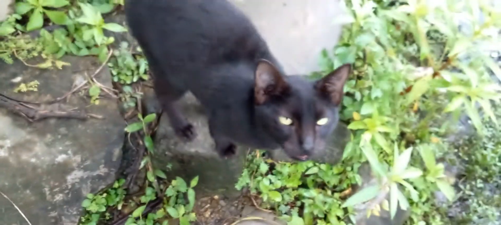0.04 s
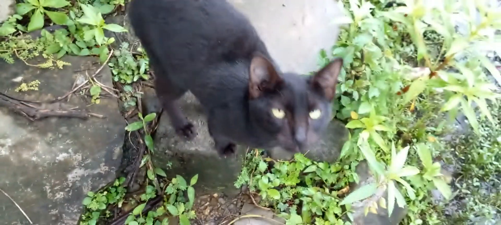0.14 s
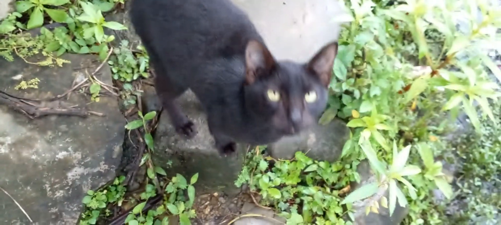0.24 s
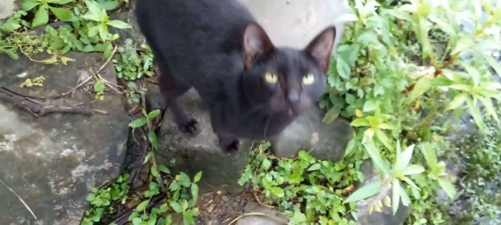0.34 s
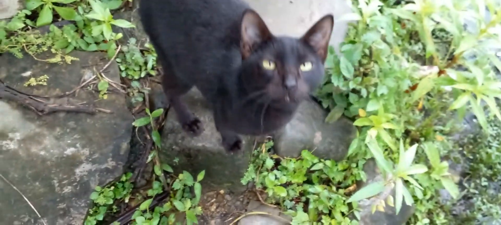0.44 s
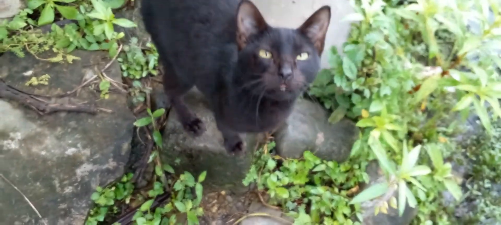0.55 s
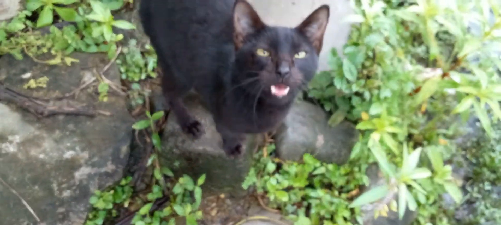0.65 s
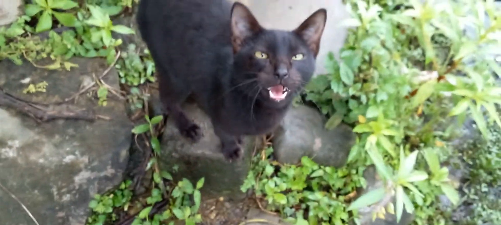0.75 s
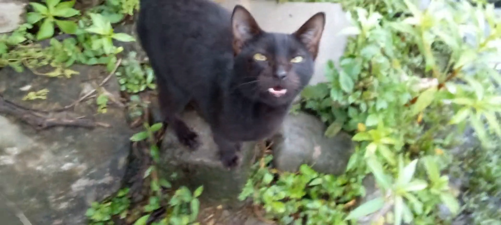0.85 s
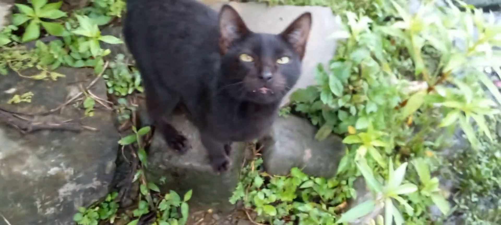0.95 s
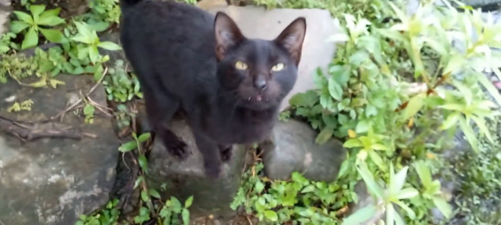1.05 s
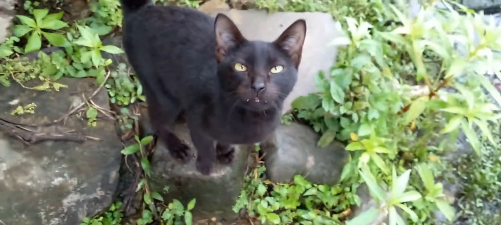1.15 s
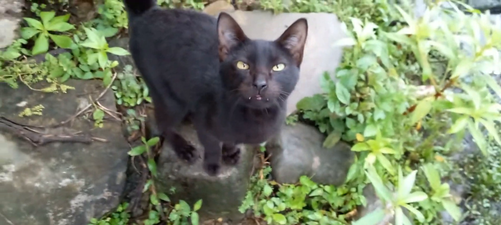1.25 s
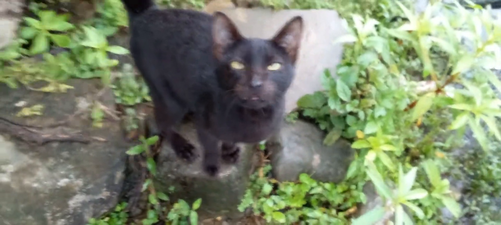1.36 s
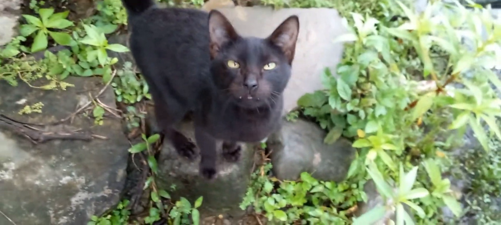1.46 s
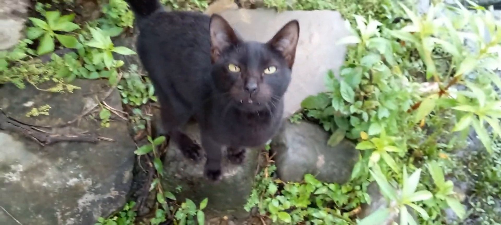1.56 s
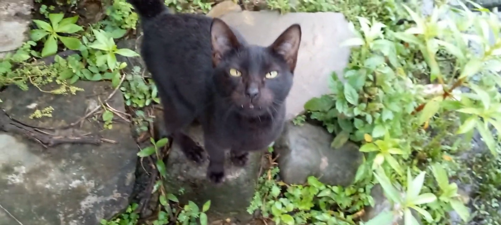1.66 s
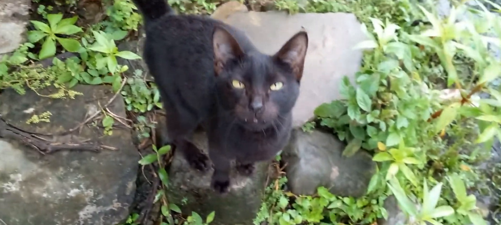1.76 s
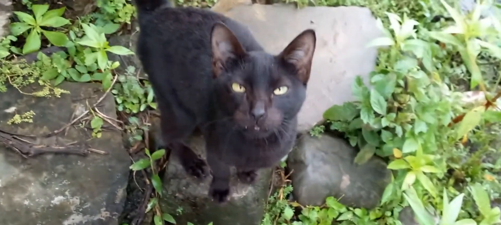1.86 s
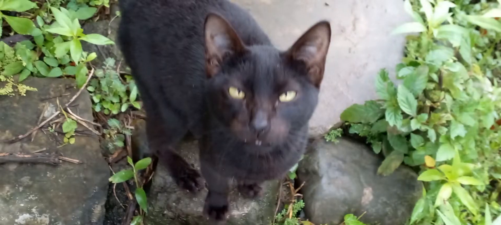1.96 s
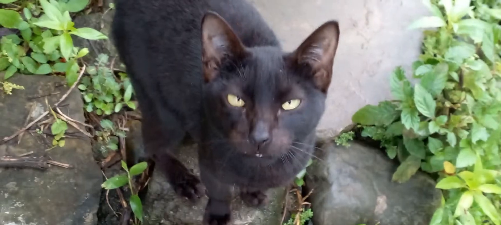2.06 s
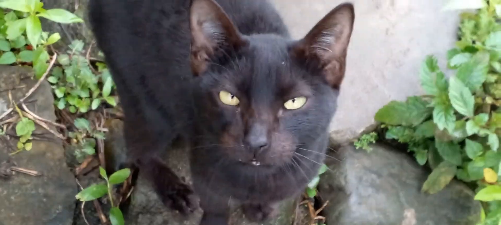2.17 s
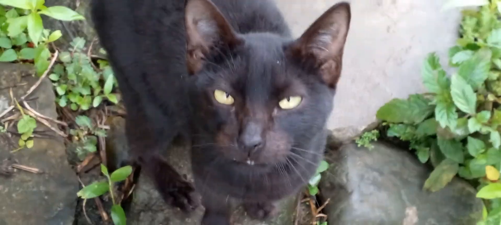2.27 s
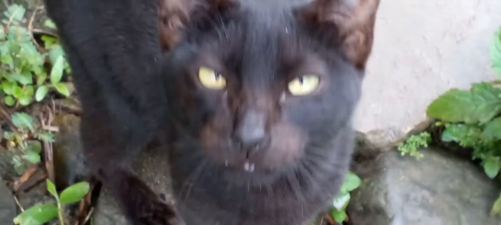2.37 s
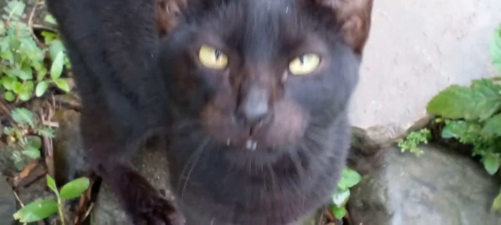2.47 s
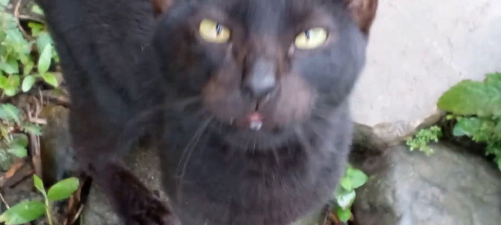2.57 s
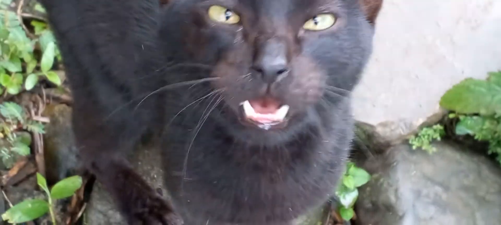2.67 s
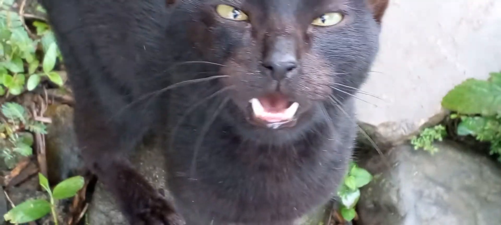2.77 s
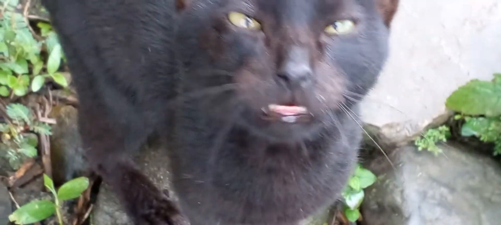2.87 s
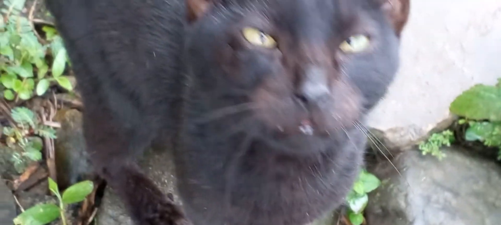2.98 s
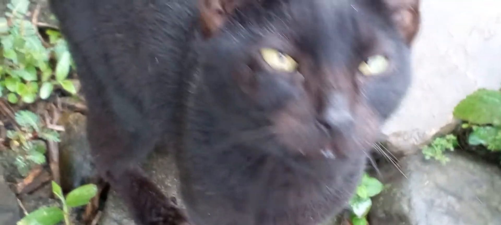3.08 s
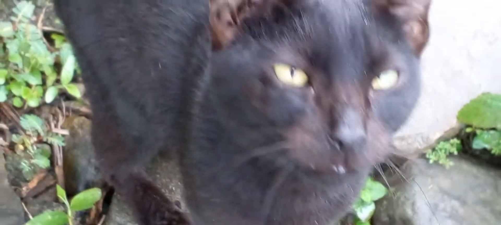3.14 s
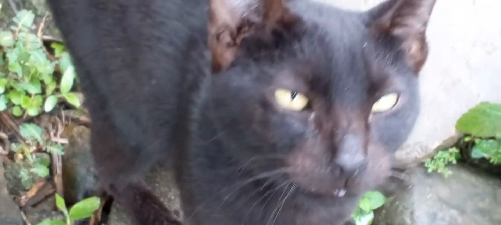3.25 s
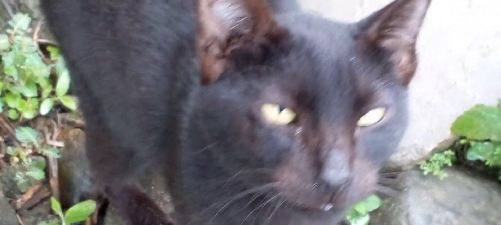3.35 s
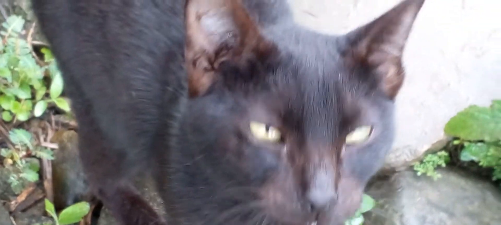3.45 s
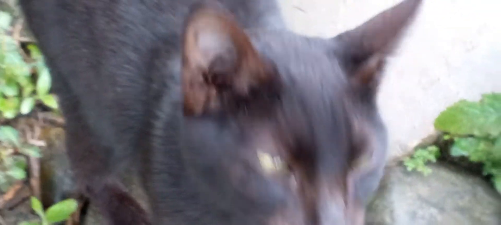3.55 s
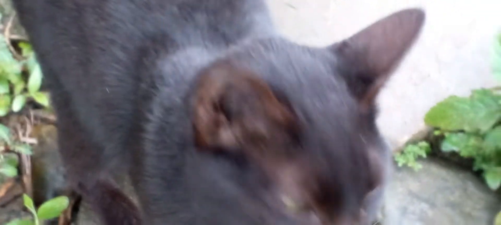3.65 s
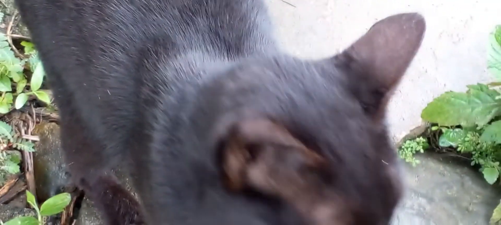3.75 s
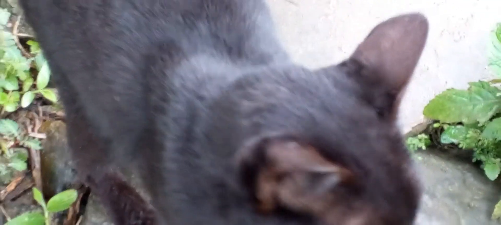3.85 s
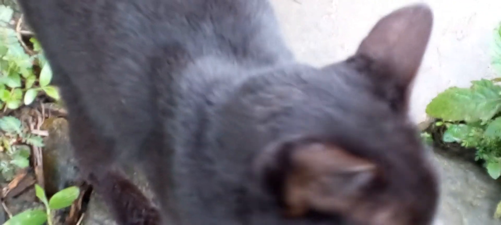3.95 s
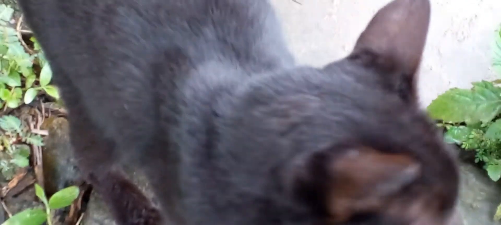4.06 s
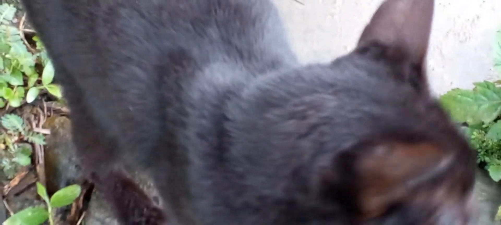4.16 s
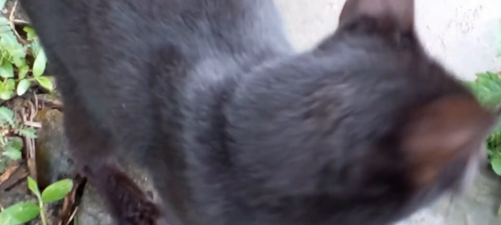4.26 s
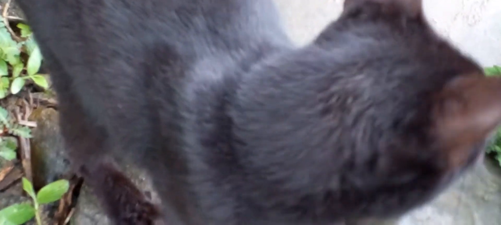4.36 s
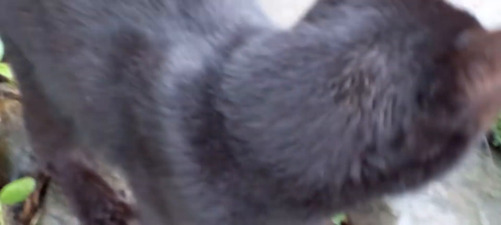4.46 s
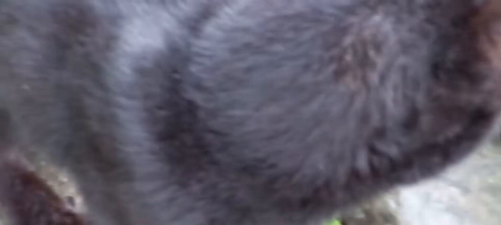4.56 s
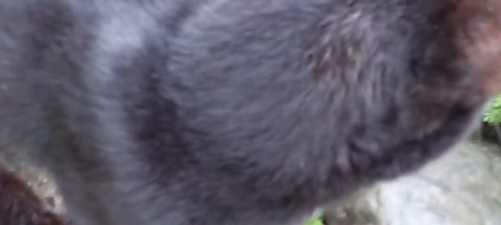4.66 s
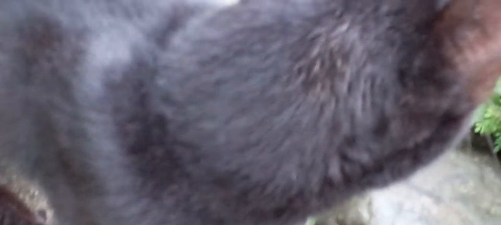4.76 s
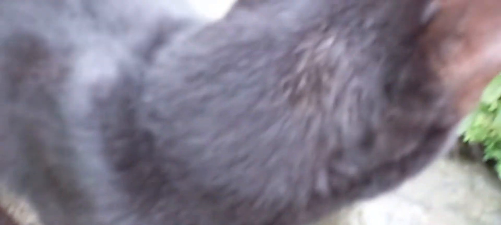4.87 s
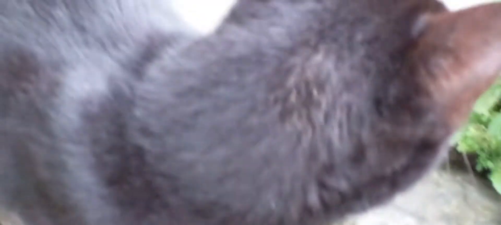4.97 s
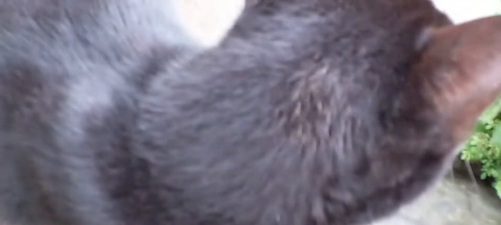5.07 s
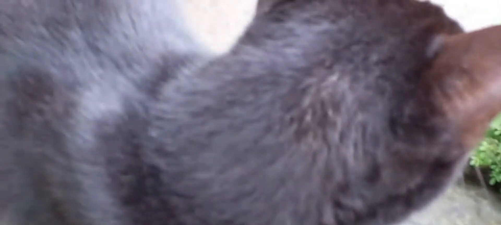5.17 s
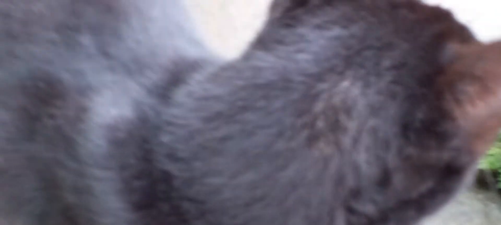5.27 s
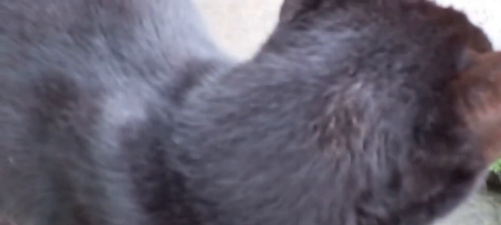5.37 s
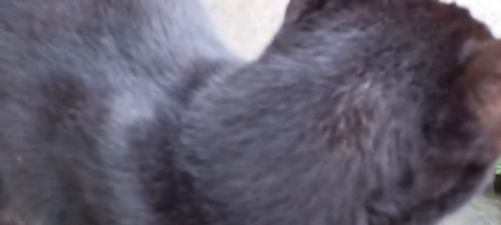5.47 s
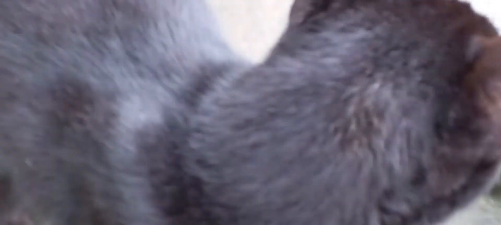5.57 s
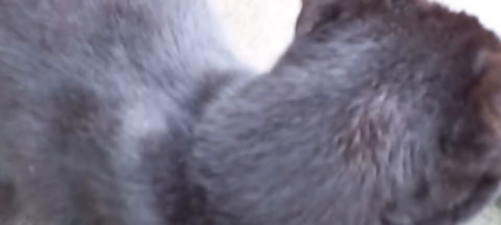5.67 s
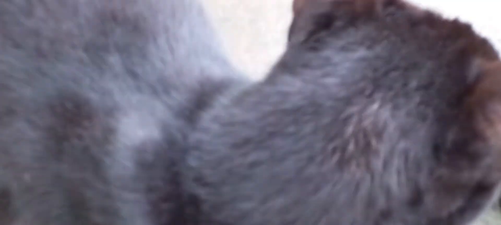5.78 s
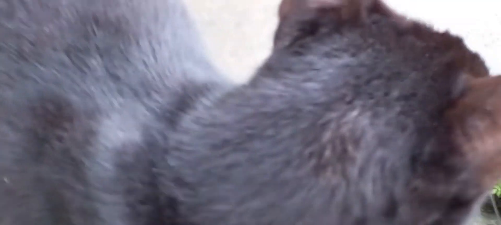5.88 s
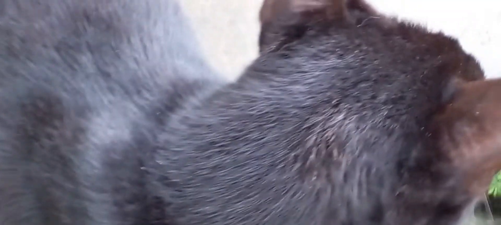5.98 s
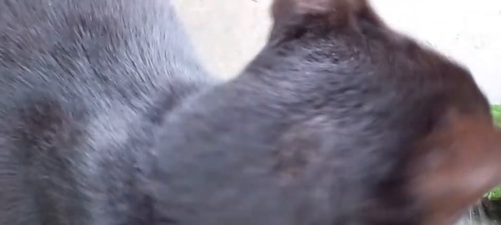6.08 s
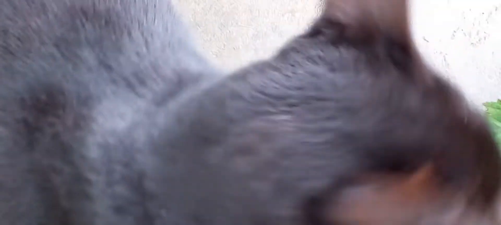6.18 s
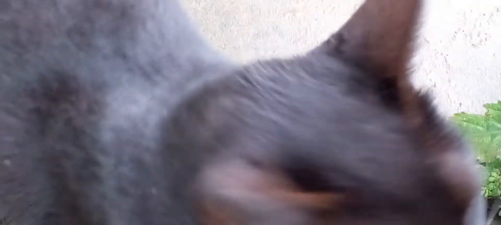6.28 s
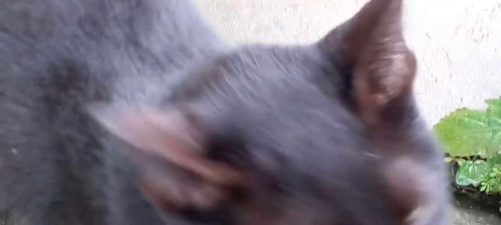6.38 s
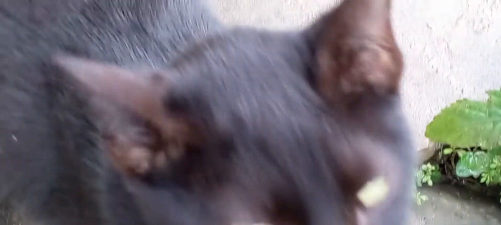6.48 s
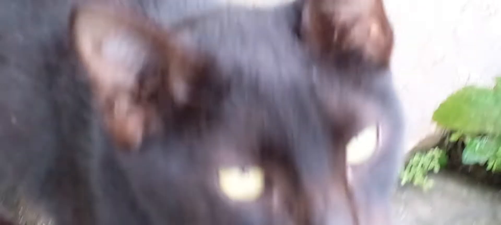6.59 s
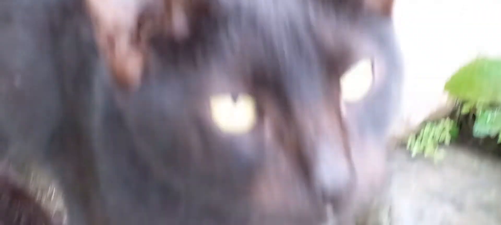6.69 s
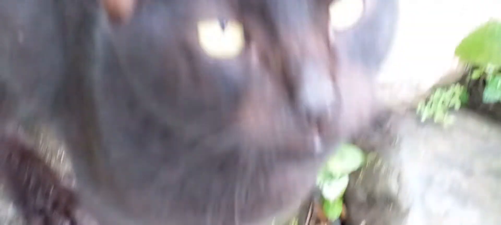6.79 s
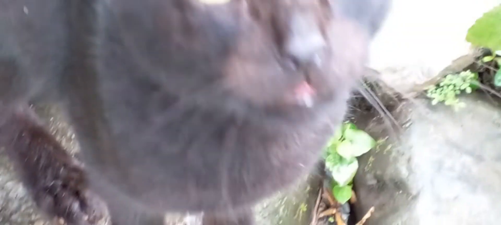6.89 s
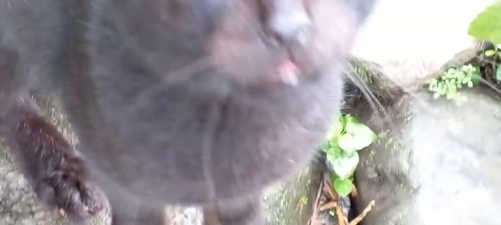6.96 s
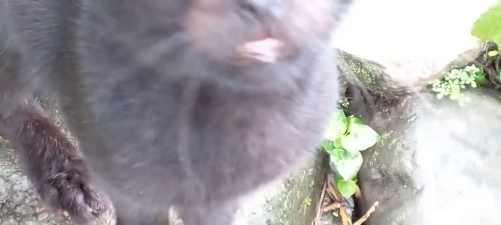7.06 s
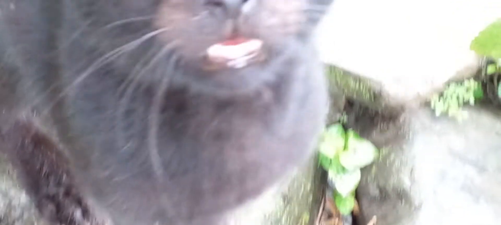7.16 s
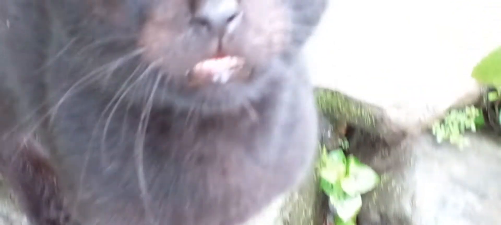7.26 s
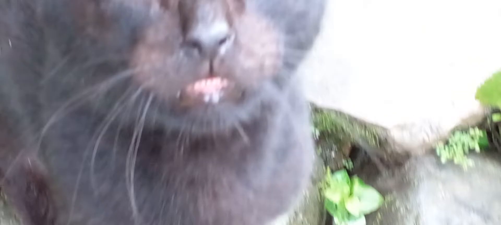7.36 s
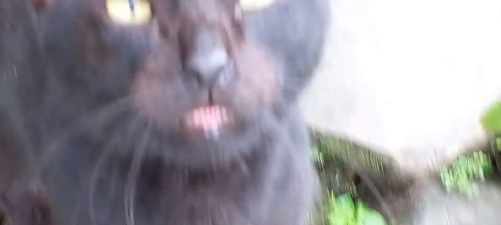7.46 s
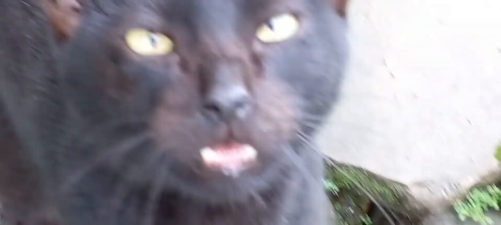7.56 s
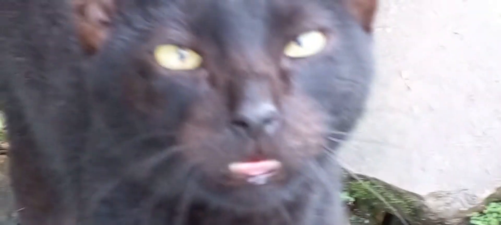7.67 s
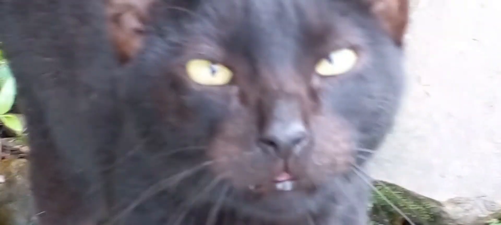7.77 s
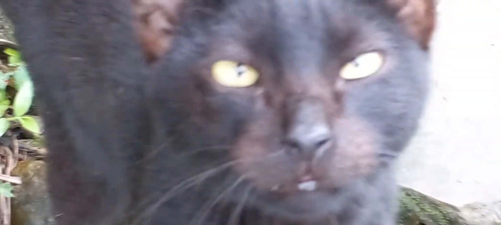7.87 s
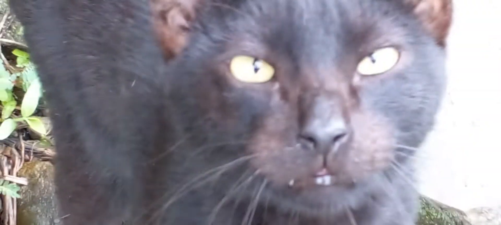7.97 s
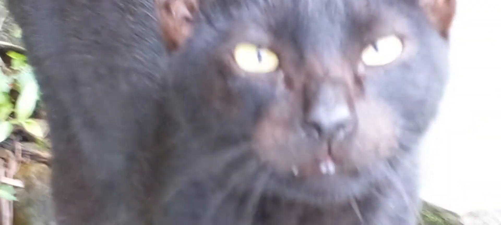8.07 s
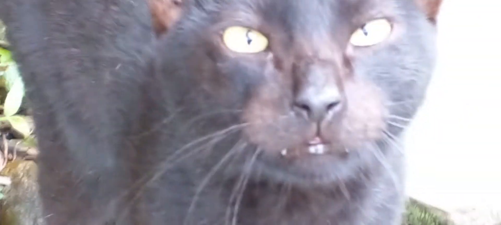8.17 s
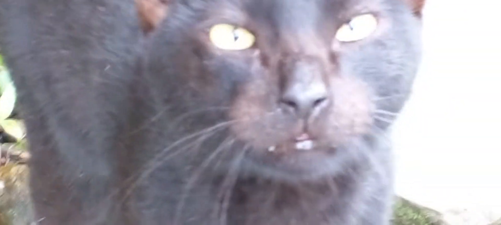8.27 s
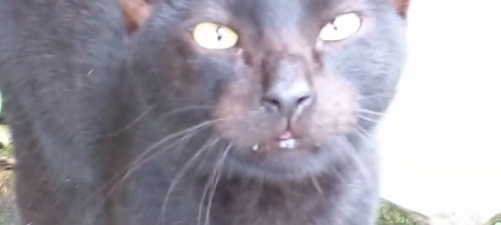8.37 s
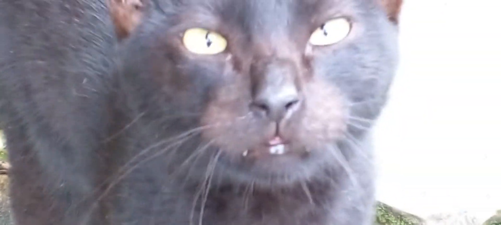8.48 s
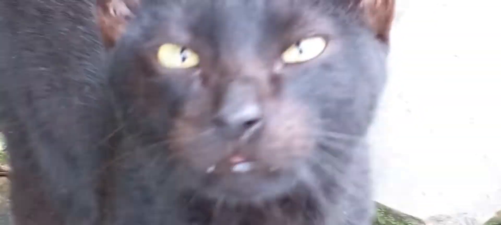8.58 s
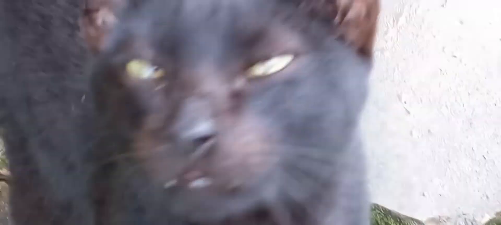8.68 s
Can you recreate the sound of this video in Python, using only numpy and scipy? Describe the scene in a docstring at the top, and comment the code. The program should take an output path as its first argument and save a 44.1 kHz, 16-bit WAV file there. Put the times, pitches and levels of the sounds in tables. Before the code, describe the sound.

A close microphone catches a cat's short, purring meows separated by quiet pauses. The last group is longest: a clean hooting mew that flips upward, then a trill with two cries. Behind it a distant bird rises into harsh echoing screeches, insects keep up a thin high hiss, and low traffic rumble carries an uneven engine that becomes stronger towards the end. A few tiny dry ticks and a dull bump sit nearby.

```python
"""In a garden between house walls a cat meows and trills close by: vocal fold harmonics through a moving mouth.
Once a thinner, purer mew of a few sine overtones flips register; dry noisy ticks and one dull bump sit near.
Farther off a bird's hoarse notes swell into screeches that trail a long echo of decaying noise.
Insects shrill steadily in narrow noise bands, and a distant engine of wavering harmonics hums
in the shaped-noise rumble and tyre wash of traffic."""
import sys
import numpy as np
from scipy import signal
from scipy.fft import rfft, irfft, next_fast_len
from scipy.io import wavfile
from scipy.ndimage import uniform_filter1d, map_coordinates

SR = 44100
rng = np.random.default_rng(int(sys.argv[2]) if len(sys.argv) > 2 else 0)


def wrap_up_sound(samples):
    """Save the sound to the file named by the first command line argument, as 16-bit audio."""
    columns = np.atleast_2d(samples).T
    # keep every value between -1 and 1, then stretch to whole-number steps
    tamed = np.clip(columns, -1, 1)
    steps = np.round(tamed * 32767).astype(np.int16)
    wavfile.write(sys.argv[1], SR, steps)


N = 384993
T = np.arange(N) / SR  # s


def amp(db):
    """Decibels to gain."""
    return 10 ** (np.asarray(db) / 20)


def unit(x):
    """x at rms 1."""
    return x / np.sqrt(np.mean(x ** 2) + 1e-20)


def along(points, hz):
    """(f/Hz, value) points read on a log frequency axis."""
    f, value = np.transpose(points)
    return np.interp(np.log(hz + 1), np.log(f), value)


def curves(rows, t):
    """Each column after the time, read at the times t."""
    s, *columns = np.transpose(rows)
    return [np.interp(t, s, column) for column in columns]


def wobble(t, rate):
    """A smooth random curve over the times t, rate knots a second."""
    u = (t - t[0]) * rate
    return map_coordinates(rng.standard_normal(int(u[-1]) + 4), [u])


def swell(t, top, leave, rise, fall):
    """A rounded attack up to 1 at top, a hold until leave, and a rounded release."""
    before, after = np.maximum(top - t, 0), np.maximum(t - leave, 0)
    return np.exp(-(before / rise) ** 2 - (after / fall) ** 2)


def filtered(x, response):
    """x times a response of frequency."""
    m = next_fast_len(N + 8192)
    return irfft(rfft(x, m) * response(np.fft.rfftfreq(m, 1 / SR)), m)[:N]


def noise(response):
    """Coloured noise of rms 1."""
    return unit(filtered(rng.standard_normal(N), response))


def resonances(modes, hz):
    """Summed gain of steep-sided resonances (f/Hz, width/Hz, level/dB)."""
    return sum(amp(db) / (1 + (2 * (hz - centre) / width) ** 2) for centre, width, db in modes)


def span(start, end, fade):
    """The times from start to end, and a gate with soft edges."""
    t = T[(T >= start) & (T < end)]
    return t, np.clip(np.minimum(t - t[0], t[-1] - t) / fade, 0, 1)


def add(track, t, x):
    """Mix x into the track at the times t."""
    track[round(t[0] * SR):][:len(t)] += x


def cycles(hz):
    """Running phase of a frequency curve, in radians."""
    return 2 * np.pi * np.cumsum(hz) / SR


def cat():
    """The meows, each with its own set of the throat."""
    # each call, a purring trill under one or two cries: start/s, end/s, trill pitch f/Hz, trill level/dB,
    # rasp 0-1, shut-mouth resonance f/Hz, low resonance level/dB re the mouth's; levels before the final lift
    calls = [(0, 0.152, 425.4, -52, 1, 2040, -3.5), (.625, 0.935, 421, -48, 0.97, 1900, -9.5),
             (2.618, 2.98, 398, -45.5, 1, 2100, -8.5), (6.859, 7.769, 439, -45.5, 0.61, 2200, -7)]
    # fixed resonances of throat and head, one list a call: f/Hz, width/Hz, level/dB re the mouth resonance
    throats = [
        [(450, 250, -10), (2500, 700, -12), (6000, 1500, -23)],
        [(450, 250, -20), (3050, 800, -3), (4900, 1000, -18), (5900, 500, -21)],
        [(450, 250, -15), (1930, 300, -6), (2680, 480, -3), (4200, 800, -22), (6450, 550, -13)],
        [(430, 220, -11), (1900, 260, -13), (2500, 220, -15), (4000, 500, -27), (5500, 800, -28),
         (6550, 600, -20)],
    ]
    out = np.zeros(N)
    for call, throat in zip(calls, throats):
        t, gate = span(call[0], call[1], fade=0.026)
        add(out, t, gate * meow(t, call, throat))
    return amp(1.5) * out


def meow(t, call, throat, flutter_hz=29.1, swing=0.084, dip_db=4.5, jitter=0.0423, hoarse=0.35,
         jaw_db=5, nasal_db=8, notch_db=11, count=18):
    """Vocal fold harmonics through the mouth; a purr-like flutter turns the voice into a trill."""
    *trill, low_db = call
    pitch, db, jaw, mouth_hz, flutter, rasp = effort(t, *trill)

    # each dip of the flutter pulls the pitch down, weakens the voice and makes it rougher
    beat = flutter * np.sin(cycles(flutter_hz * (1 + 0.069 * wobble(t, 14.06))))
    rough = np.abs(rasp * (1 - 0.81 * beat))
    pitch = pitch * (1 + swing * beat + jitter * rough * wobble(t, 350) + 0.00223 * wobble(t, 71.7))

    # dropping the jaw raises the first resonance and lets the treble out; closing it leaves a nasal murmur
    tract = [(860 + 260 * jaw, 330 + 150 * jaw, low_db), (mouth_hz, 430, 0), *throat]
    valleys = [(1380, 340, notch_db * (1 - jaw)), (2880 + 780 * jaw, 700, 16)]  # f/Hz, width/Hz, depth/dB

    phase, voice, power = cycles(pitch), 0, 0
    for k in range(1, count + 1):
        hz = k * pitch
        murmur_db = nasal_db * np.clip((1300 - hz) / 900, 0, 1)
        muffle_db = jaw_db * np.clip((hz - 2400) / 1200, 0, 1)
        valley_db = sum(depth / (1 + (2 * (hz - centre) / width) ** 2) for centre, width, depth in valleys)
        gain = resonances(tract, hz) * amp((1 - jaw) * (murmur_db - muffle_db) - valley_db)
        lag = sum(np.arctan(2 * (hz - centre) / width) for centre, width, _ in tract)
        turbulence = (0.0036 + hoarse * rough) * (wobble(t, 420) + 1j * wobble(t, 420))
        voice = voice + gain * np.real((1 + turbulence) * np.exp(1j * (k * phase - lag)))
        power = power + (k > 1) * gain ** 2 / 2
    # the level is held by the overtones, so the fundamental is left out of the power
    voice = voice / np.sqrt(uniform_filter1d(power, SR // 25))

    # where the folds beat irregularly, a broad creak fills the gaps between the harmonics
    creak_tone = np.sin(cycles(np.full(len(t), 1450)))
    creak = unit(wobble(t, 1700) * creak_tone * amp(5.2 * wobble(t, 260)))
    return amp(db + dip_db * beat) * (voice + .5 * rasp * creak)


def effort(t, start, end, trill_hz, trill_db, trill_rasp, shut_mouth_hz, lead=0.042, linger=1.57):
    """Each cry lifts the trill: the voice catches and clears, pitch climbs, jaw drops, flutter nearly stops."""
    # where the cat pushes and opens its mouth: t/s at full push, glide up/s, length/s, fall/s, top f/Hz,
    # level/dB before the cat's final lift, jaw opening 0-1, mouth resonance over pitch
    all_cries = [(-.15, .05, 0.094, .08, 490, -26, 0.7, 5.5),
                 (0.695, .072, .098, 0.053, 542, -33.5, 1, 4.08),
                 (2.689, .055, 0.093, 0.078, 502, -31.5, 1, 4.73),
                 (7.148, .055, .068, .055, 491, -39, .5, 4.78),
                 (7.551, 0.047, 0.093, .052, 516, -36, 1, 4.37)]
    onset_hz, rise_s, attack_s = 356.6, .079, 0.028  # starting pitch, its rise, time for the voice to catch
    sink_s, purr_db = .078, -16  # away from the cries the trill sinks to a faint, creaky purr
    flutter_grows_s, clean_rasp = 0.22, 0.11  # build-up of the flutter; rasp left in a full cry

    cries = [cry for cry in all_cries if start - .3 < cry[0] < end]
    first_s, first_glide, *_ = cries[0]
    last_s, _, last_length, last_fall, *_ = cries[-1]
    before_s = np.maximum(first_s - lead - t, 0)
    after_s = np.maximum(t - last_s - last_length - linger * last_fall, 0)
    purr = np.minimum((before_s + after_s) / sink_s, 1)

    rest_hz = np.where(t < first_s + first_glide, onset_hz, trill_hz)
    pitch, db = rest_hz, trill_db + purr_db * purr
    jaw, mouth_hz, rasp = 0, shut_mouth_hz, trill_rasp + purr * (1 - trill_rasp)
    flutter = np.clip((t - min(start, first_s)) / flutter_grows_s, purr, 1)
    for s, glide, length, fall, top_hz, cry_db, opening, mouth_ratio in cries:
        push = swell(t, s, s + length, attack_s, fall)
        tension = swell(t, s + glide, s + length, rise_s, fall)
        pitch = pitch + tension * (top_hz - rest_hz)
        db = db + push * (cry_db - trill_db)
        jaw = np.clip(jaw + opening * push * tension, 0, 1)
        mouth_hz = mouth_hz + push * (mouth_ratio * pitch - mouth_hz)
        rasp = rasp + push * (clean_rasp - rasp)
        flutter = flutter * (1 - 0.923 * push * tension)
    return pitch, db, jaw, mouth_hz, flutter, rasp


def paving(x, delay=0.00186, bounce=0.089):
    """The stones under the cat throw back a copy that makes neighbouring harmonics uneven."""
    return x + bounce * np.interp(T - delay, T, x)


def mew(flip_s=0.015):
    """A clean, hooting call through a nearly shut mouth; it flips to a higher register at the end."""
    # overtones: multiple, low-register level/dB, high-register level/dB before a 12.5 dB cut
    tone = [(2, -3.5, -10), (3, -2, -3), (4, -14, -3), (6, -16, -32), (7, -28, -36)]
    start_s, break_s, end_s = 6.222, 6.63, 6.705
    low_start_hz, low_climb = 645.5, 122  # low register: Hz, Hz per s
    high_start_hz, high_climb = 778, 550  # high register: Hz, Hz per s
    scoop_hz, scoop_s, accent_db = 109, 0.0158, 7  # it starts sharp and loud, and settles
    base_db, swell_rate, release_rate = -34, 5.5, 148  # dB, dB per s up, dB per s down after the break
    overtone_db, fade_rate, bloom_s = -3.5, 23.5, 0.064  # overtones come in late, then fade (dB per s)

    out = np.zeros(N)
    t, gate = span(start_s, end_s, fade=0.0065)
    age, after = t - start_s, np.maximum(t - break_s, 0)
    high = np.clip(.5 + (t - break_s) / flip_s, 0, 1)
    low_hz = low_start_hz + low_climb * age + scoop_hz * np.exp(-age / scoop_s)
    pitch = (1 - high) * low_hz + high * (high_start_hz + high_climb * after)
    phase = cycles(pitch * (1 + .005 * wobble(t, 90)))

    bloom = np.minimum(age / bloom_s, 1)
    db = base_db + swell_rate * age + accent_db * (1 - bloom) - release_rate * after
    bright_db = overtone_db - fade_rate * age * (1 - high) - 22 * (1 - bloom) - 2.1 * high
    # the mouth closes slowly, dulling the higher overtones
    closing_db = -34 * age * (1 - high)
    overtones = 0
    for k, low_db, high_db in tone:
        register_db = low_db + high * (high_db - low_db - 12.5)
        level = amp(register_db + closing_db * (k > 2) + 2.4 * wobble(t, 49.2))
        overtones = overtones + level * np.sin(k * phase)
    add(out, t, gate * amp(db) * (unit(np.sin(phase)) + amp(bright_db) * unit(overtones)))
    return out


def ticks(t60=.04):
    """Short dry ticks, each a noisy ring over a broad crack."""
    # small ticks and rustles: t/s, level/dB before a 4.5 dB lift, centre f/Hz
    hits = [(.031, -34, 5880), (.194, -57, 4800), (.354, -55, 4390), (5.239, -52, 2200),
            (6.194, -41.5, 1960)]
    out = np.zeros(N)
    for s, db, hz in hits:
        t, gate = span(s - .002, s + .06, fade=0.00087)
        ring = wobble(t, 920) * np.sin(cycles(hz + 0 * t))
        crack = 0.26 * rng.standard_normal(len(t))
        decay_db = -60 * (t - t[0]) / t60
        add(out, t, gate * amp(db + 4.5 + decay_db) * (ring + crack))
    return out


def bump(s=8.485, hz=370, db=-51, length=0.027):
    """One soft, dull bump with no ring: a short swell of band noise."""
    return amp(db) * np.exp(-((T - s) / length) ** 2) * noise(lambda f: resonances([(hz, 260, 0)], f))


def bird(lead=.185, attack_s=0.059, count=7):
    """A hoarse rising note swells and breaks into a harsh screech with a faint octave."""
    # screeches: t/s at the peak, note f/Hz, screech f/Hz, level/dB before the final mix
    screeches = [(.555, 1262, 5720, -38.5), (1.73, 1180, 5880, -39), (2.351, 1069, 5310, -54.5),
                 (3.593, 1139, 5720, -41), (4.003, 1095, 5610, -42), (6.133, 1220, 5730, -36.5)]
    # colour of the hoarse note: f/Hz, relative level/dB
    colour = [(1200, -3.5), (2400, -6), (3600, 3.5), (4700, 10.5), (6200, 4), (7400, -3), (9000, -20)]
    note_db, note_fade = -7, 34  # note re the screech (dB), its fall on either side of the peak (dB per s)
    out = np.zeros(N)
    for s, pitch, screech_hz, db in screeches:
        t, gate = span(s - lead, s + 0.074, fade=0.033)
        u = t - s
        hz = pitch * (1 + .42 * np.minimum(u + 0.027, 0) + 0.00826 * wobble(t, 59.9))
        phase = cycles(hz * (1 + .022 * wobble(t, 900)))
        note = 0
        for k in range(1, count + 1):
            note = note + amp(along(colour, k * hz) + 2 * wobble(t, 55)) * np.sin(k * phase)
        note = unit(note * amp(3.5 * wobble(t, 650)))
        note = note * np.minimum((t - t[0]) / attack_s, 1)
        note = note * amp(note_db - note_fade * np.abs(u))

        harsh = cycles(screech_hz * (1 + 0.52 * u + 0.056 * wobble(t, 1500)))
        screech = unit(np.sin(harsh) + amp(-21.5) * np.sin(2 * harsh))
        screech = screech * amp(2.4 * wobble(t, 302.3)) / (1 + (u / 0.058) ** 2) ** 2
        add(out, t, gate * amp(db) * (note + screech))
    return out


def walls(x):
    """The echo of the yard, a noise tail in which each frequency dies at its own speed."""
    # echo decay: f/Hz, t60/s
    decay = [(300, 0.91), (2000, 0.46), (5500, 0.82), (12000, 0.66)]
    hz, t, z = signal.stft(rng.standard_normal(SR), SR, nperseg=256)
    fade = amp(-60 * t / along(decay, hz)[:, None])
    tail = signal.istft(z * fade, SR, nperseg=256)[1]
    return signal.fftconvolve(x, tail / np.linalg.norm(tail))[:N]


def insects():
    """A steady shrill chorus of noise bands, and one small insect chirping far above it."""
    # chorus bands: f/Hz, width/Hz, relative level/dB
    bands = [(6730, 580, -5), (7554, 760, -0.5), (9350, 940, -9), (9950, 980, -19), (14700, 1600, -16)]
    # chirps of the small insect: t/s
    chirp_times = [.2, .45, 2.45, 3.74, 4.97, 6.4, 7.18, 7.72, 8.48]
    chirp_db, chirp_s = -71.5, 0.088  # level and half length of each chirp
    contour = [(5800, -20), (6500, -0.5), (8000, 1), (8400, -5.5), (9000, -1), (10200, 0),
               (11500, -45), (14500, -4.5)]  # f/Hz, level/dB
    chorus = noise(lambda hz: resonances(bands, hz) * amp(along(contour, hz)))
    shimmer_db = .5 * wobble(T, 4) + .6 * wobble(T, 60)
    chirps = amp(chirp_db) * sum(swell(T, s, s, chirp_s, chirp_s) for s in chirp_times)
    chirp_noise = noise(lambda hz: resonances([(14100, 930, 0)], hz))
    return amp(-57.5 + shimmer_db) * chorus + chirps * chirp_noise


def traffic():
    """Low rumble, a soft far wash of tyres, and one engine running unevenly with a booming exhaust."""
    # rumble spectrum: f/Hz, relative density level/dB
    rumble_shape = [(15, -12), (25, -5.5), (48, -2.5), (81, 2), (171, -4), (199, -1), (228, -13),
                    (272, -1.5), (311, -13.5), (372, -11.5), (403, -21.5), (456, -20.5), (650, -33),
                    (840, -68), (1430, -120)]
    # tyre wash spectrum: f/Hz, relative density level/dB
    wash_shape = [(350, -12), (600, -8.5), (1100, -0.5), (1800, -2.5), (2300, -10), (3200, -16.5),
                  (6000, -20), (11000, -22.5), (15500, -41)]
    # the engine's swells: t/s, firing note level/dB before the orders, exhaust boom level/dB
    engine_levels = [(0.0, -56, -59), (0.39, -50, -68), (1.14, -67, -58), (2.11, -55.5, -60),
                     (4.91, -46, -46), (5.15, -50.5, -46.5), (5.81, -39, -39), (6.59, -34.5, -49),
                     (6.66, -48, -48.5), (6.98, -39.5, -53), (7.37, -40, -39), (7.68, -31, -42),
                     (7.83, -41.5, -44), (8.24, -46, -49.5), (8.39, -33.5, -43), (8.73, -53, -44)]
    # harmonics of the firing note: multiple, relative level/dB
    orders = [(1, -1.5), (2, -6), (4, -12.5), (5, -20)]
    # it slowly speeds up: t/s, firing rate f/Hz
    firing_rate = [(3.8, 66.23), (5.9, 69.84), (8.4, 71.35)]
    rumble_db, wash_db, ebb_rate = -42.5, -59, 0.2225  # dB, dB, slow decline of both in dB per s
    swell_s, swell_width_s, swell_db = 3.57, 1.9, 3.5  # one broad swell
    usual_db, follow = -47, 0.71  # usual engine level; share of its swells that reaches the higher orders

    flow_db = swell_db * swell(T, swell_s, swell_s, swell_width_s, swell_width_s) - ebb_rate * T
    skirts = [(20, -36), (32, -12), (48, 0.5), (550, 0.5), (1100, -49)]  # f/Hz, level/dB
    rumble = noise(lambda hz: amp(along(rumble_shape, hz) + along(skirts, hz)))
    rumble = amp(rumble_db + flow_db + 20 * wobble(T, 5.5) / 20) * rumble
    wash = noise(lambda hz: amp(along(wash_shape, hz)))
    wash = amp(wash_db + flow_db + 1.1 * wobble(T, 7.4)) * wash

    (rate,), (db, boom_db) = curves(firing_rate, T), curves(engine_levels, T)
    phase = cycles(rate * (1 + 0.00818 * wobble(T, 8)))
    overtones_db = usual_db + follow * (db - usual_db)
    engine = 0
    for k, level in orders:
        order_db = (db if k == 1 else overtones_db) + level
        engine = engine + amp(order_db + 3.9 * wobble(T, 4)) * np.sin(k * phase)
    # the exhaust booms at three times the firing rate
    boom = amp(boom_db + 2 * wobble(T, 4)) * np.sin(3 * phase)
    return rumble + wash + engine + boom


def scene():
    """The near cat is almost dry; the far bird trails a long echo."""
    near = paving(cat()) + mew() + ticks() + bump()
    far = bird()
    echo = walls(amp(-30) * near + amp(-2.5) * far)
    return (near + amp(1.0) * far + echo + insects() + traffic())[None]


def record(dry):
    """A steep band limit: nothing above 15750 Hz passes."""
    top_hz = 15750
    return np.array([filtered(x, lambda hz: hz < top_hz) for x in dry])


dry = scene()
out = record(dry)
wrap_up_sound(out)
```